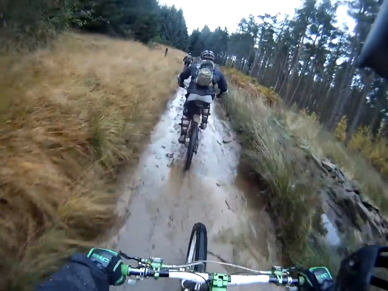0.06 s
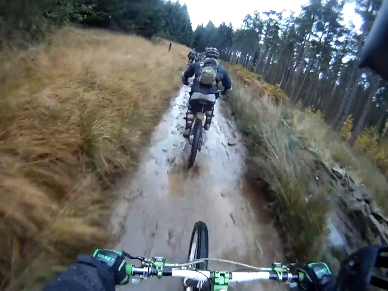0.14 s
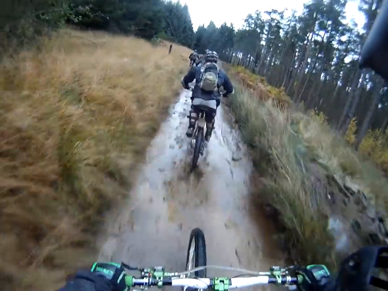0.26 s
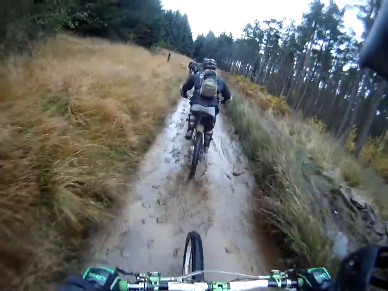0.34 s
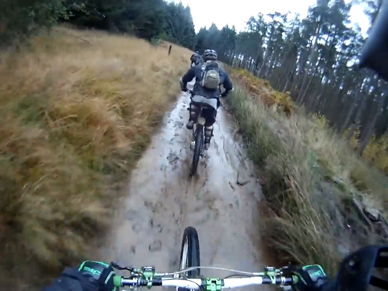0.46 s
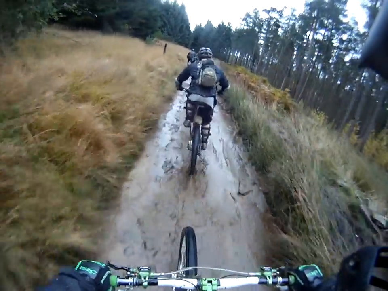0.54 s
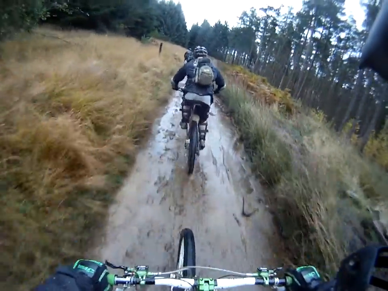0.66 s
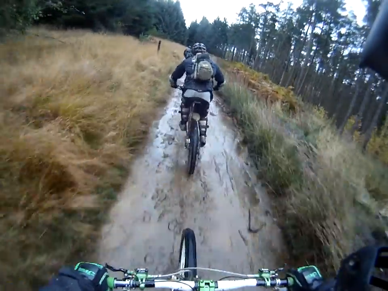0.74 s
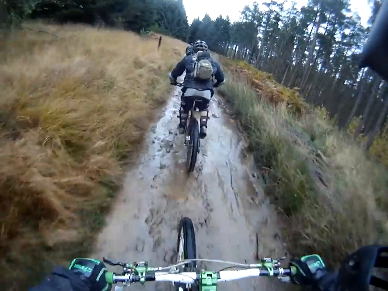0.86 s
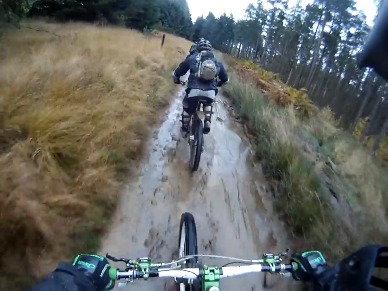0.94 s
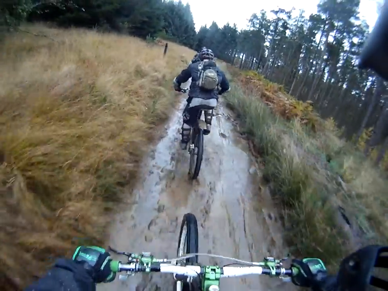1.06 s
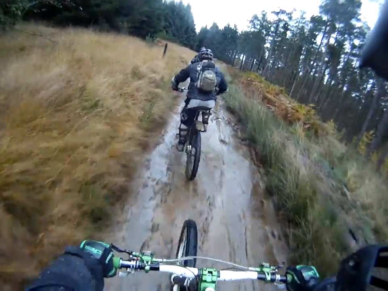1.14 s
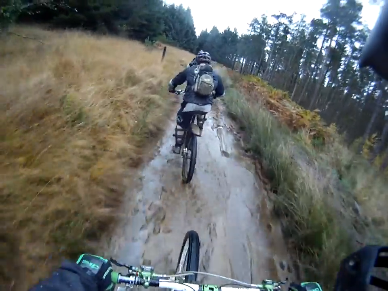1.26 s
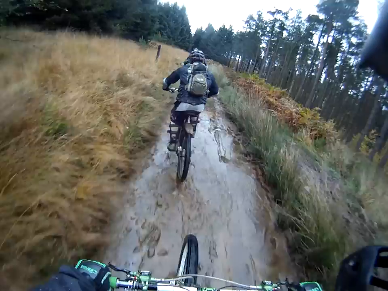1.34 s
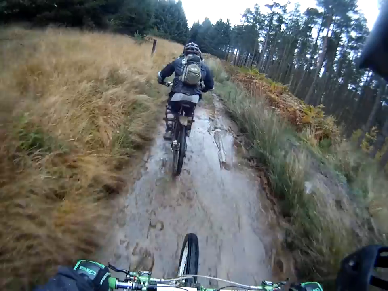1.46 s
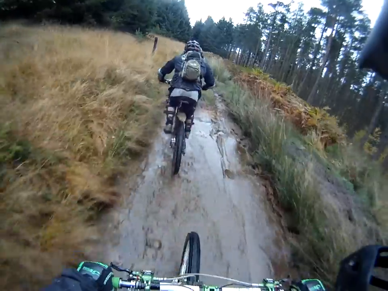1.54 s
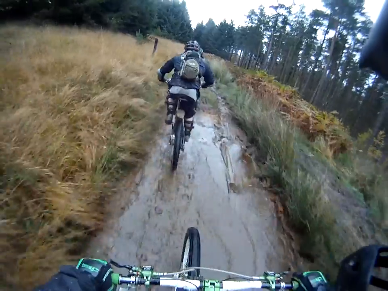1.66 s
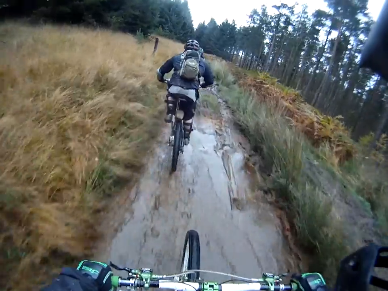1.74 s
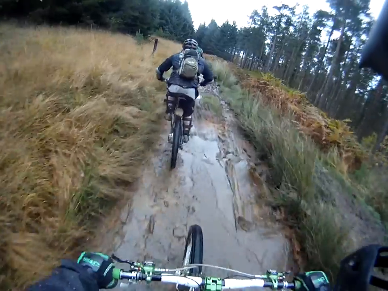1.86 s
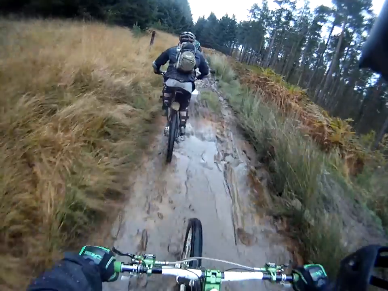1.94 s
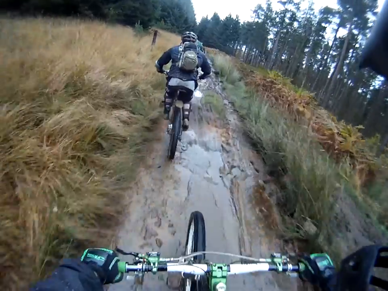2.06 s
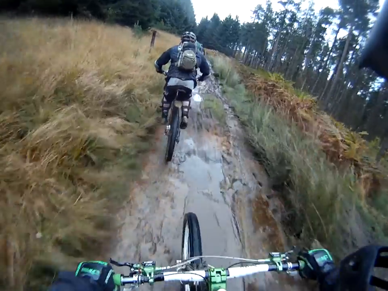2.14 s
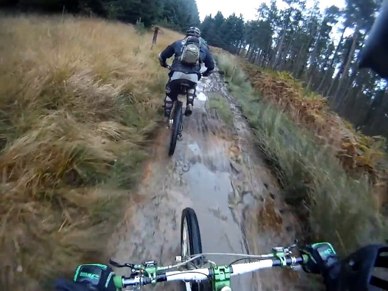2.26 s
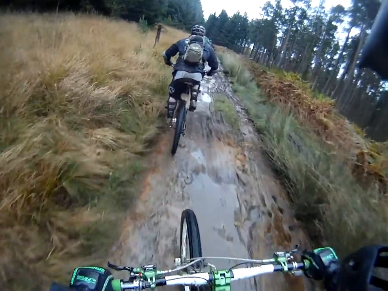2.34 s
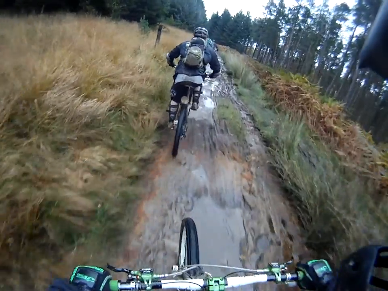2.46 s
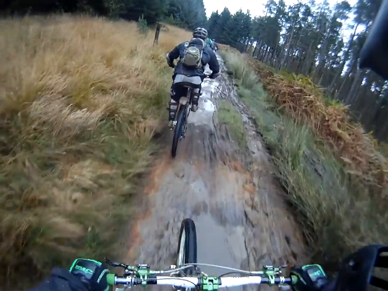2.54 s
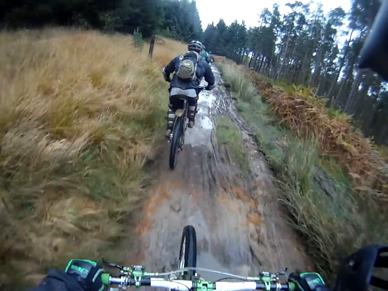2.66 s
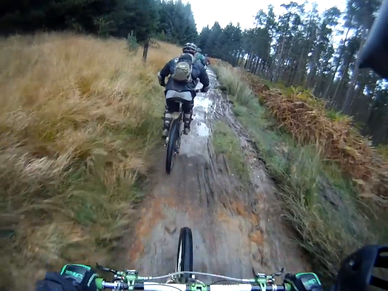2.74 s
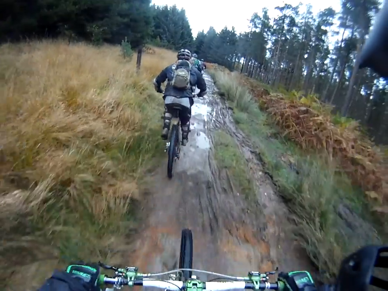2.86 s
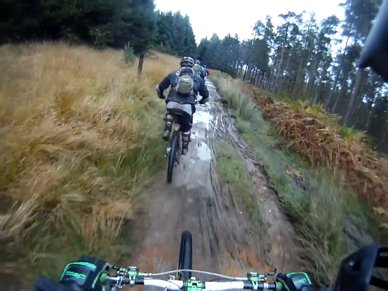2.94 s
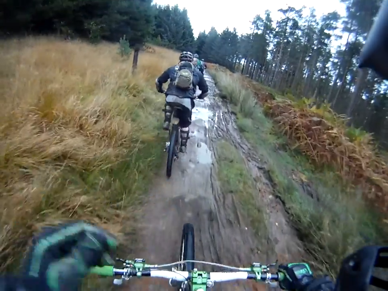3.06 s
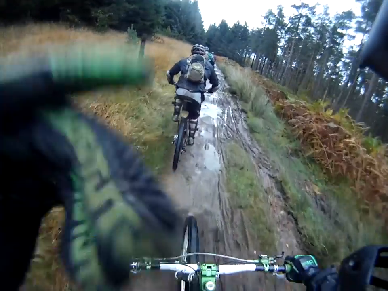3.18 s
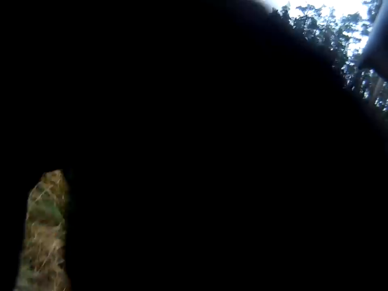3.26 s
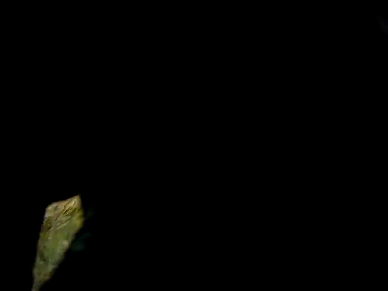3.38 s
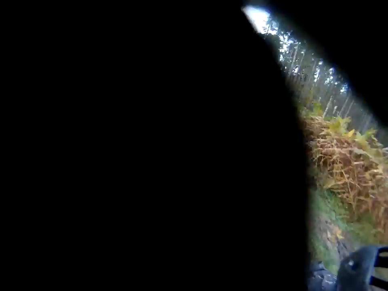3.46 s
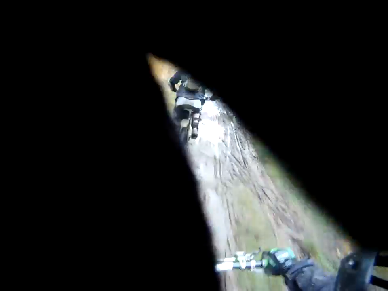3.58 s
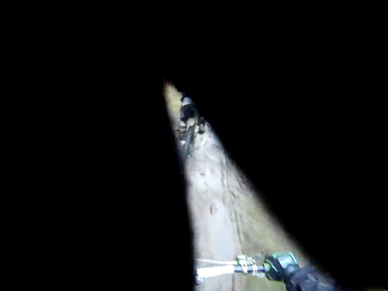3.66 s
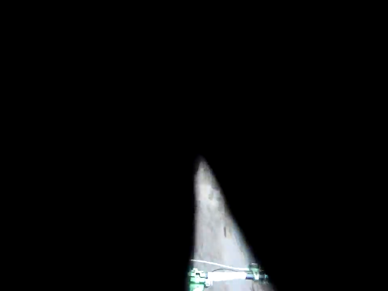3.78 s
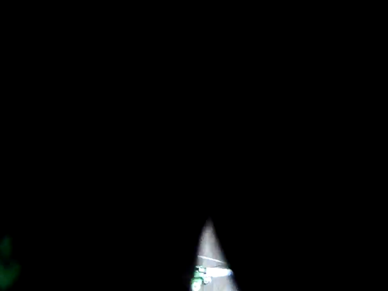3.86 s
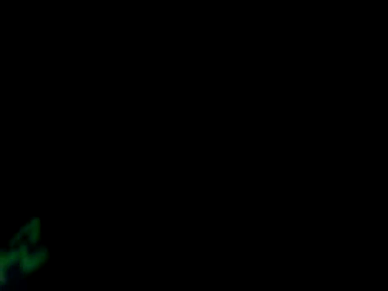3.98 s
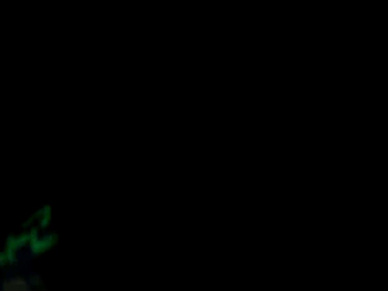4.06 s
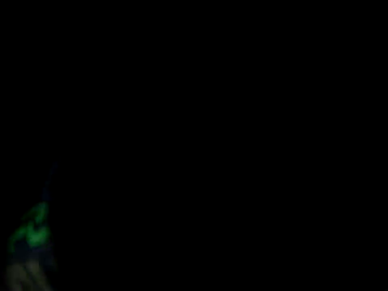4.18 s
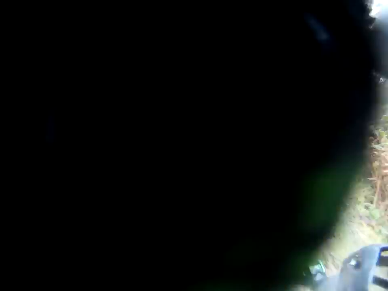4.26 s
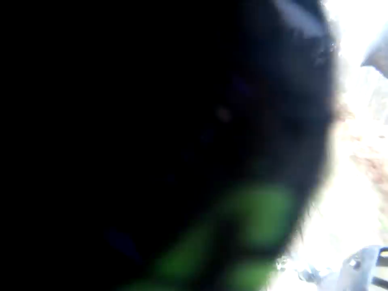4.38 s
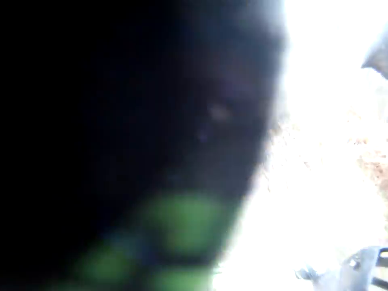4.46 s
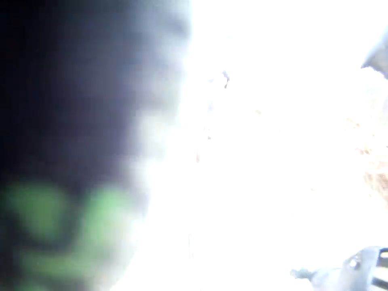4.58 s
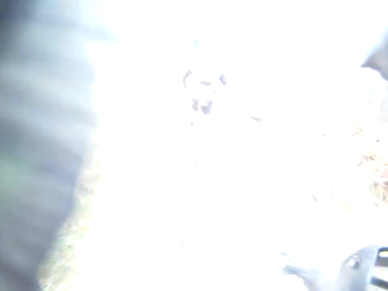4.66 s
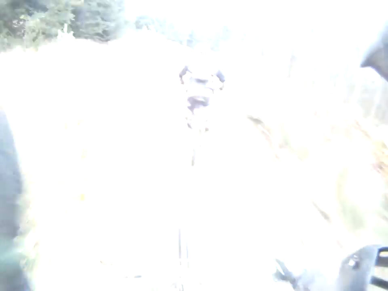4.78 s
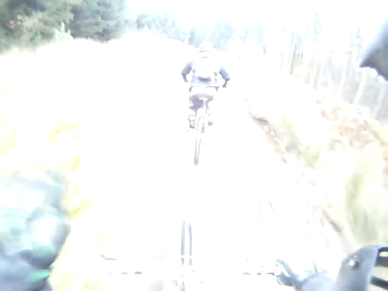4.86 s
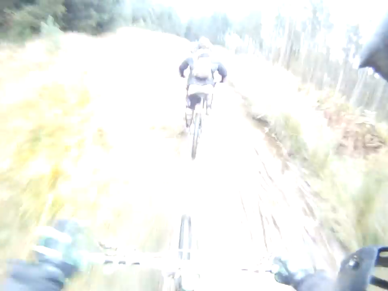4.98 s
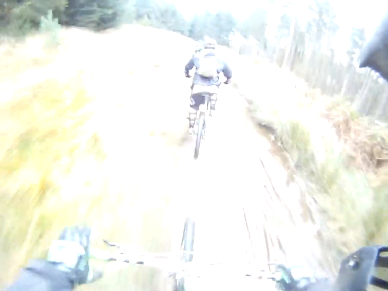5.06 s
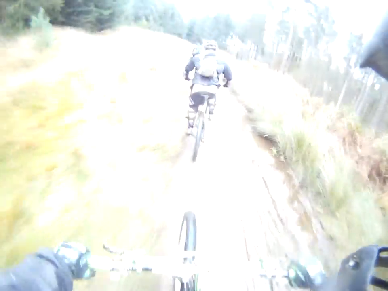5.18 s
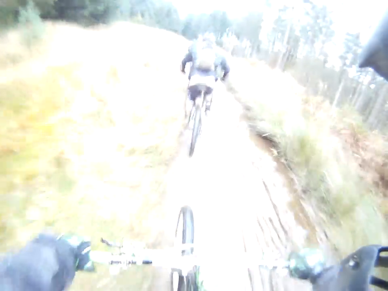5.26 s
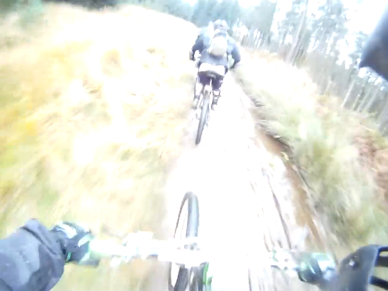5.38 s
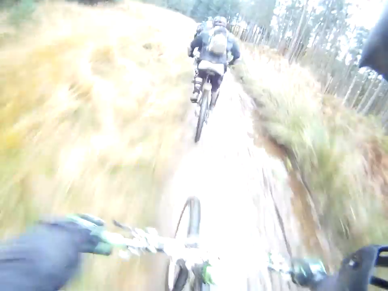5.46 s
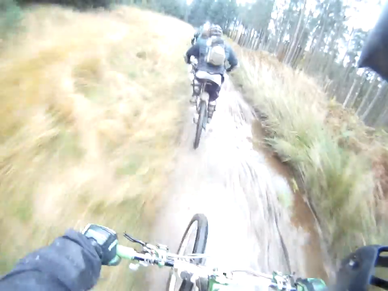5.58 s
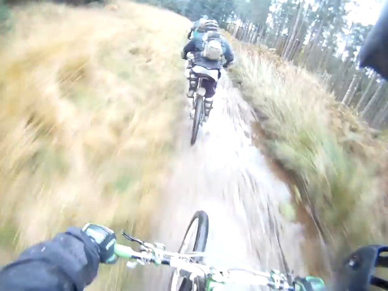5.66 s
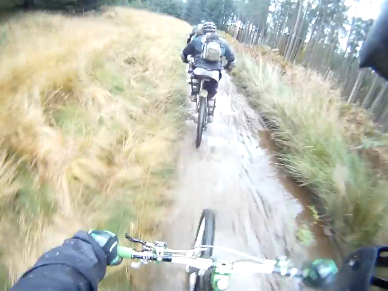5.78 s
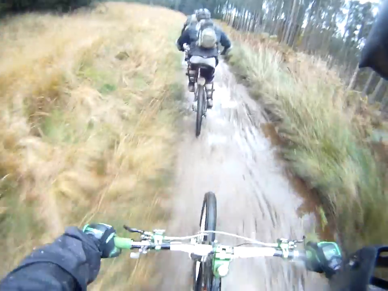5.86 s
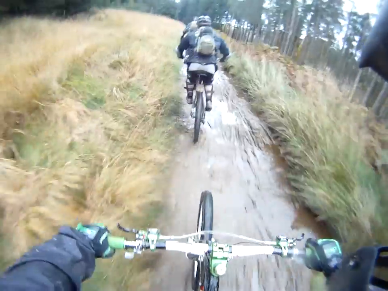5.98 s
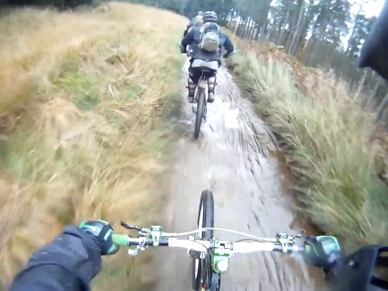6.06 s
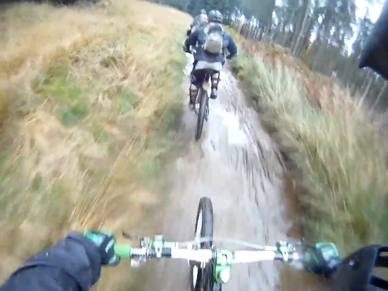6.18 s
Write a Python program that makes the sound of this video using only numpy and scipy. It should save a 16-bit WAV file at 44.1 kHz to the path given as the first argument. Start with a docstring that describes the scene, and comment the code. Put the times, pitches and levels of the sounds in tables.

```python
"""First come tyre hiss and a low rumble, heard by a helmet camera riding along a muddy forest trail.
The camera's sealed plastic case rings at its own pitches (its modes) as spray, mud and knocks reach it.
Bumps rock the case on its mount, and the helmet dips with soft thuds. Just past halfway a glove lands
on the case, wipes the lens and lifts off. The camera samples slowly and holds each value,
which adds a gritty treble."""
import sys
import numpy as np
from scipy import signal
from scipy.fft import rfft, irfft
from scipy.io import wavfile
from scipy.ndimage import uniform_filter1d

SR = 44100
rng = np.random.default_rng(int(sys.argv[2]) if len(sys.argv) > 2 else 0)


def generate_wav(signal):
    """Clip the signal to [-1, 1] and save it as 16-bit WAV at the path in sys.argv[1]."""
    frames = np.transpose(np.atleast_2d(signal))
    scaled = np.clip(frames, -1, 1) * 32767
    pcm = np.round(scaled).astype(np.int16)
    wavfile.write(sys.argv[1], SR, pcm)


N = 274302


def gain_of(db):
    """Turns decibels into a number to multiply by."""
    return 10 ** (np.asarray(db) / 20)


def unit_level(x):
    """Scales a sound to an average (rms) level of 1."""
    return x / np.sqrt(np.mean(x ** 2) + 1e-20)


def curve(rows, column=1):
    """Joins one column of a table with straight lines over time."""
    columns = np.transpose(rows)
    return np.interp(np.arange(N) / SR, columns[0], columns[column])


def coloured(x, points):
    """Turns pitches up or down along a list of (pitch_hz, gain_db) points."""
    hz, db = np.transpose(points)
    bins_hz = np.fft.rfftfreq(len(x), 1 / SR)
    gain_db = np.interp(np.log(bins_hz + 1), np.log(hz), db)
    return irfft(rfft(x) * gain_of(gain_db), len(x))


def drift(seconds):
    """A smooth random wobble that changes over about this time."""
    size = max(int(seconds * SR), 1)
    return unit_level(uniform_filter1d(uniform_filter1d(rng.standard_normal(N), size), size))


def add(mix, start_s, sound):
    """Mixes a sound in at its start time."""
    part = mix[round(start_s * SR):][:len(sound)]
    part += sound[:len(part)]


def mode_rings(modes, tilt_db=0, stretch=1, seconds=.1):
    """One fading tone per mode; tilt_db (per octave) favours high ones, stretch scales the ring time."""
    t = np.arange(round(seconds * SR)) / SR
    hz, db, ring_s = np.transpose(modes)[:, :, None]
    sign = (-1.) ** np.arange(len(modes))[:, None]  # neighbours swing against each other
    start_db = db + tilt_db * np.log2(hz / hz[len(modes) // 2])
    fade_db = 60 * t / (ring_s * stretch)
    return sign * gain_of(start_db - fade_db) * np.sin(2 * np.pi * hz * t)


def shaken(rings, patchy_db, seconds):
    """Shakes each mode with its own noise, which comes and goes in patches."""
    shaking = [rng.standard_normal(N) * gain_of(patchy_db * drift(seconds)) for _ in rings]
    return signal.oaconvolve(np.array(shaking), rings, axes=1)[:, :N]


# How the case walls ring: pitch_hz, level_db, ring_s (time to fade by 60 dB)
CASE_MODES = [(868, -18, 0.046), (922, -18, 0.028), (1296, -2, 0.019), (1609, 0.5, 0.022),
              (1903, 4.5, 0.0097), (2265, -12, 0.032), (2300, 5.5, 0.0055), (2757, -3, 0.0071),
              (2910, -6.5, 0.0081), (3563, 2.5, 0.0073), (4035, -11, 0.013), (4750, -15, 0.0076),
              (4990, 0, 0.0033), (5470, -5, 0.0053)]
# How loud the tyres are in wet mud: time_s, level_db
TYRE_LEVELS = [(0.0, -46), (0.5, -50.5), (1.2, -48.5), (1.43, -53.5), (1.68, -54.5), (1.84, -50.5),
               (2.31, -52), (2.53, -57), (3.32, -55.5), (4.82, -61), (4.99, -56), (5.69, -56), (6.07, -53),
               (6.22, -57)]


def tyres():
    """The tread hisses and throws fine spray in short gusts, heard through the case."""
    rings = mode_rings(CASE_MODES, tilt_db=4.5, stretch=1.46)
    hiss = shaken(rings, patchy_db=2.0, seconds=.011).sum(0)
    gusts = gain_of(1.6 * drift(.02) + 2.2 * drift(.003))
    return gain_of(curve(TYRE_LEVELS)) * unit_level(hiss * gusts)


# How the case rocks on its mount: pitch_hz, level_db, ring_s
MOUNT_MODES = [(90.1, 4.5, 0.14), (152.2, 10.5, 0.056), (241.2, 12, 0.065), (308, 3.5, 0.02),
               (405, -8, 0.035)]
# How loud the swaying head and mount rumble: time_s, level_db
SWAY_LEVELS = [(0.0, -38.5), (0.28, -42.5), (0.71, -48.5), (1.05, -48), (1.23, -35), (1.4, -57.5),
               (1.7, -52), (2.41, -48), (2.53, -35), (2.76, -67), (2.93, -45.5), (3.52, -36), (4.05, -35.5),
               (4.47, -30.5), (4.68, -32.5), (4.85, -42), (5.16, -54.5), (5.56, -46.5), (5.72, -44.5),
               (6.13, -41), (6.22, -60)]
# The tone of that rumble: pitch_hz, gain_db
SWAY_TONE = [(15, 1.5), (35, -7), (70, -6), (140, -18.5), (250, -22), (400, -30.5), (700, -45.5),
             (1500, -57)]


def sway():
    """Head motion and wind make a lumpy rumble and keep the mount murmuring."""
    lumps = rng.standard_normal(N) * gain_of(4.5 * drift(.017))
    rumble = unit_level(coloured(lumps, SWAY_TONE))
    shaking = rng.standard_normal(N) * gain_of(4.2 * drift(.018))
    mount_ring = mode_rings(MOUNT_MODES, seconds=.4).sum(0)
    murmur = unit_level(signal.oaconvolve(shaking, mount_ring)[:N])
    return gain_of(curve(SWAY_LEVELS)) * (rumble + gain_of(-15.5) * murmur)


# Bumps that jolt the mount: start_s, peak_db, bass_db_per_octave, ring_factor, pitch_factor
MOUNT_JOLTS = [(0.008, -25, -14.5, 1, 0.89), (0.53, -20, 5, 0.85, 0.86), (0.565, -23.5, 5, 0.36, 1.27),
               (0.575, -25.5, -3.5, 1.4, 1.05), (0.881, -28, 5, 2.1, 1.01), (1.109, -25, -5.5, 0.87, 0.85),
               (1.239, -18.5, 1, 0.64, 0.93), (1.25, -19, -5, 1.1, 0.87), (1.322, -23, 5, 0.68, 1.19),
               (1.332, -26, 3.5, 1.5, 1.02), (1.753, -31, 3, 1.2, 0.77), (1.792, -22, 8, 1.5, 1.01),
               (1.957, -30.5, -3.5, 1.2, 0.94), (2.191, -27.5, 8.5, 1.4, 0.97),
               (2.207, -22, -7.5, 1.1, 0.91), (2.417, -43, 2, 0.6, 0.98), (2.487, -32, 8, 0.48, 1.01),
               (2.517, -14, -1, 1.4, 1), (2.708, -33, -5.5, 2.7, 1.04), (2.786, -26, 5, 1.95, 1.2),
               (2.8, -27.5, -22, 1.2, 0.95), (2.995, -32.5, -3, 0.57, 0.7),
               (3.326, -15.5, 10.5, 0.65, 1.23), (3.352, -17, -11.5, 1.6, 1.03),
               (3.384, -22.5, -0.5, 2, 1.08), (3.451, -30, 3, 1.1, 0.94), (3.633, -16, 6, 0.77, 0.82),
               (3.801, -9, 2, 0.79, 0.9), (3.886, -10.5, -1.5, 0.89, 1.1), (4.084, -5, 0.5, 0.41, 1.07),
               (4.303, -26.5, -10, 4.8, 0.88), (4.321, -4.5, 3.5, 0.5, 1.125), (4.392, -21.5, 0, 1.5, 1.09),
               (4.441, -18.5, 11, 1.6, 0.93), (4.564, -12, 2, 0.9, 1.105), (4.623, -30, -14.5, 3.9, 1.06),
               (4.698, -21.5, -2, 3.5, 1.01), (4.737, -13, 5, 0.64, 1.02), (4.762, -8, -7, 1.8, 0.96),
               (4.876, -26, -4, 0.85, 0.87), (5.456, -15.5, 3, 1.7, 0.98), (5.484, -18, -0.5, 0.36, 0.81),
               (5.699, -37, -5, 2.4, 0.94), (5.879, -28.5, -6, 2, 1.03), (5.956, -25, 7, 1.4, 0.86),
               (5.973, -21, -19, 2.14, 1.02), (6.081, -27, 6, 1.3, 0.91), (6.162, -9.5, 3, 1.76, 1.07)]


def jolts(push_s=.0021):
    """Each bump pushes the case, which then rocks at pitches that shift with the mount's grip."""
    out, t = np.zeros(N), np.arange(400) / SR
    push = np.sin(np.pi * np.clip(t / push_s, 0, 1)) ** 2
    for start_s, peak_db, bass_db, ring_factor, pitch_factor in MOUNT_JOLTS:
        modes = np.array(MOUNT_MODES) * [pitch_factor, 1, 1]
        ring = mode_rings(modes, -bass_db, ring_factor, seconds=.3).sum(0)
        thump = -signal.fftconvolve(ring, push)
        add(out, start_s, gain_of(peak_db) * thump / abs(thump).max())
    return out


def mud_ticks(ticks_per_s=60):
    """Specks of mud land at random, each ringing one wall mode; their level follows the tyre hiss."""
    out, rings = np.zeros(N), mode_rings(CASE_MODES, stretch=1.46)
    for when, which, chance in rng.random((round(ticks_per_s * N / SR), 3)):
        strength_db = .5 - 2.5 * np.log(chance + .0013)  # many faint, a few stronger
        tick = gain_of(strength_db) * rings[int(which * len(rings))]
        add(out, when * (N / SR - .1), tick)
    return gain_of(curve(TYRE_LEVELS)) * out


# Dips of the helmet: start_s, level_db, pitch_hz
HELMET_DIPS = [(0.162, -33.5, 45.5), (0.253, -36.5, 44.4), (0.443, -27.5, 45.3), (0.486, -31, 41),
               (0.505, -30.5, 38.5), (0.64, -33, 51), (0.879, -25, 39.7), (1.088, -32.5, 56),
               (1.194, -23.5, 37.3), (1.751, -29, 33.4), (1.932, -35.5, 51.5), (2.19, -28.5, 54),
               (2.344, -34.5, 41.3), (2.782, -29.5, 29.5), (2.887, -28, 41.7), (2.978, -30, 34.3),
               (3.134, -41, 44.6), (3.323, -20, 30.5), (3.432, -22.5, 41), (3.67, -27.5, 35.3),
               (3.73, -29, 38.4), (3.825, -22, 25.1), (4.003, -23.5, 40.4), (4.287, -16, 42.8),
               (4.442, -15.5, 55), (4.718, -17, 37), (4.743, -16.5, 45), (4.858, -30, 32.3),
               (5.354, -23.5, 38), (5.562, -32, 52), (5.958, -35, 31), (6.079, -29, 50.6)]


def helmet_dips():
    """The helmet dips and springs back in little more than one swing."""
    out, t = np.zeros(N), np.arange(round(.15 * SR)) / SR
    fade_in = np.minimum(t / .0018, 1)
    for start_s, level_db, pitch_hz in HELMET_DIPS:
        swing = -np.sin(2 * np.pi * pitch_hz * t)
        fade_out = np.exp(-(pitch_hz * t / 1.38) ** 2)
        add(out, start_s, gain_of(level_db) * swing * fade_in * fade_out)
    return out


# Knocks and scuffs on the case: start_s, level_db, treble_db_per_octave, contact_s
CASE_KNOCKS = [(0.448, -32, -1.5, 0.0029), (0.514, -41, 4, 0.0019), (0.535, -32, -2, 0.0021),
               (0.567, -37, 1.5, 0.003), (0.814, -37.5, 5.5, 0.0047), (0.885, -14.5, 2, 0.0019),
               (0.944, -40, 3, 0.0077), (1.096, -34.5, 6, 0.0067), (1.202, -27, 2.5, 0.0029),
               (1.698, -33.5, -5.5, 0.0018), (1.752, -10.5, 2.5, 0.0019), (1.869, -39, 7, 0.013),
               (1.952, -36.5, 2, 0.0046), (2.191, -27, -4, 0.0036), (2.349, -35.5, 5.5, 0.005),
               (2.519, -33.5, -7, 0.0015), (2.786, -21, -2, 0.002), (2.836, -39.5, -2, 0.0066),
               (2.883, -41, 2, 0.0054), (2.986, -30, 5.5, 0.0034), (3.134, -40, 6, 0.0068),
               (3.327, -20.5, -11, 0.0018), (3.436, -27, 17, 0.0024), (3.745, -24, 5, 0.007),
               (3.973, -29.5, 5, 0.0048), (4.055, -19, 2.5, 0.0021), (4.085, -9.5, -3.5, 0.0014),
               (4.29, -18, -1, 0.0026), (4.328, -12, -2.5, 0.0017), (4.448, -13.5, 4, 0.0021),
               (4.76, -17, 4, 0.0023), (4.864, -36.5, 2.5, 0.0065), (5.357, -27, 5, 0.0038),
               (5.458, -22, -6, 0.00027), (5.462, -28.5, -6, 0.005), (5.494, -32.5, -10, 0.00079),
               (5.565, -40, 3, 0.0015), (5.68, -31, 6.5, 0.0047), (5.757, -39, -2, 0.0042),
               (5.955, -15, -7.5, 0.0015), (5.968, -16, -11.5, 0.0044), (6.083, -5, 8.5, 0.0021),
               (6.163, -21, -7.5, 0.00088), (6.169, -37, -2, 0.0015)]


def knocks():
    """A snap at first touch, then a short scuff of noise, set the case walls ringing."""
    out, t = np.zeros(N), np.arange(2000) / SR
    for start_s, level_db, treble_db, contact_s in CASE_KNOCKS:
        progress = t / contact_s
        force = rng.standard_normal(len(t)) * progress ** .73 * np.exp(-progress)
        snap_db = 13.5 + 1.18 * level_db - 10 * np.log2(contact_s / .0024)  # hard, short knocks snap most
        force[0] = gain_of(snap_db) * np.linalg.norm(force)
        ring = mode_rings(CASE_MODES, treble_db, stretch=.6).sum(0)
        knock = signal.fftconvolve(force, ring)
        peak = np.sqrt(2 * uniform_filter1d(knock ** 2, size=44).max())  # the loudest millisecond
        add(out, start_s, gain_of(level_db) * knock / peak)
    return out


# Two strokes of the glove: time_s, level_db, spread_db_per_octave (boosts modes far from cavity_hz)
GLOVE_STROKES = [(3.322, -31.5, -24), (3.366, -32.5, -14), (3.386, -22.5, -3), (3.416, -33, 5.5),
                 (3.47, -26, -3), (3.53, -28.5, 4.5), (3.605, -21.5, -5), (3.63, -28, 2),
                 (3.728, -34.5, 10), (3.765, -23.5, 6), (3.81, -32.5, 10), (3.95, -34.5, 11),
                 (4.05, -35, 1), (4.075, -41, 13), (4.19, -36, 8), (4.32, -21.5, -25), (4.345, -35.5, 5),
                 (4.44, -23.5, -28), (4.47, -31, -1.5), (4.676, -32, -7), (4.72, -24.5, 0.5),
                 (4.764, -16, 1), (4.778, -35, 4), (4.81, -33, -10)]
# The tone of the slipping fabric: pitch_hz, gain_db
GLOVE_TONE = [(300, 4), (600, -4.5), (1200, 2), (1650, -1.5), (2100, 9), (2700, 0), (3500, 3), (5500, 3)]


def glove(cavity_hz=2060, high_spread_share=.18, fade_s=.008):
    """Fabric catches and slips on the plastic; the hollow behind the lens answers it best."""
    octaves = np.log2(np.transpose(CASE_MODES)[0][:, None] / cavity_hz)
    distance = np.where(octaves > 0, high_spread_share * octaves, -octaves)  # high modes spread less
    spread = gain_of(curve(GLOVE_STROKES, column=2) * distance)
    walls = shaken(mode_rings(CASE_MODES, stretch=.9), patchy_db=1.6, seconds=.012)
    catches = gain_of(1.6 * drift(.003) + .7 * drift(.015))
    rub = coloured((walls * spread).sum(0), GLOVE_TONE) * catches
    t = np.arange(N) / SR
    land_s, lift_s = GLOVE_STROKES[0][0], GLOVE_STROKES[-1][0]
    touching = np.clip(np.minimum(t - land_s, lift_s - t) / fade_s, 0, 1)
    return touching * gain_of(curve(GLOVE_STROKES)) * rub / rub[touching > 0].std()


def scene():
    """Adds all the sounds into one channel."""
    return (tyres() + glove() + sway() + helmet_dips() + jolts() + knocks() + mud_ticks())[None]


def record(dry, slow_rate_hz=12000, top_hz=16500):
    """The camera samples slowly and holds each value, which mirrors lower pitches into the treble."""
    smooth = signal.sosfilt(signal.butter(8, 5500, fs=SR, output="sos"), dry[0])
    slow = signal.resample(smooth, round(N * slow_rate_hz / SR))
    held = signal.resample(np.repeat(slow, 4), N)
    tone = [(5, -12.5), (18, 2.5), (15200, .5), (15500, -21), (20000, -12.5)]  # weak at both far ends
    treble_cut = signal.firwin(511, top_hz, window=("kaiser", 9), fs=SR)
    return signal.oaconvolve(coloured(held, tone), treble_cut, "same")[None]


dry = scene()
out = record(dry)
generate_wav(out)
```